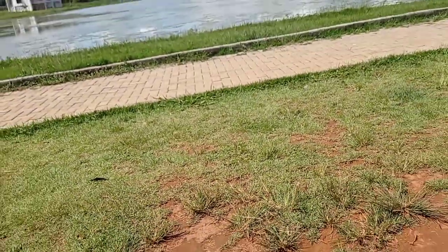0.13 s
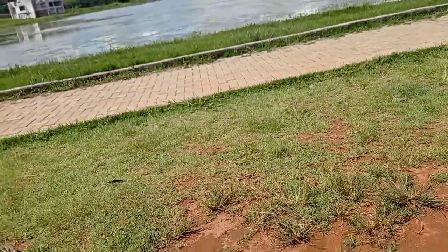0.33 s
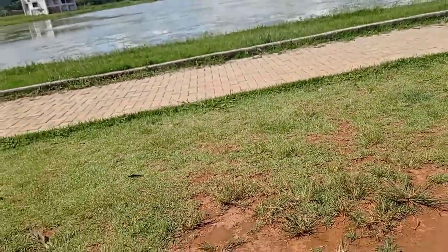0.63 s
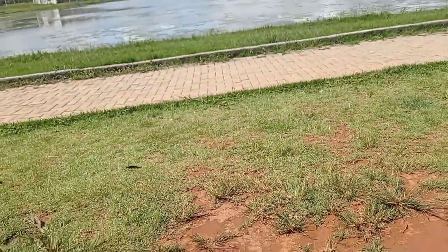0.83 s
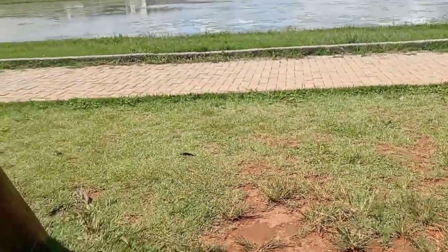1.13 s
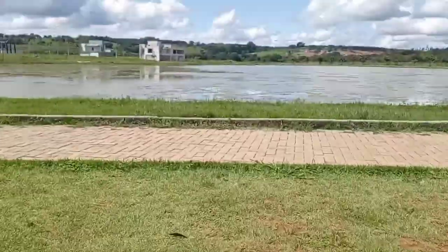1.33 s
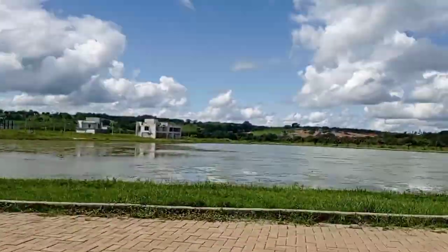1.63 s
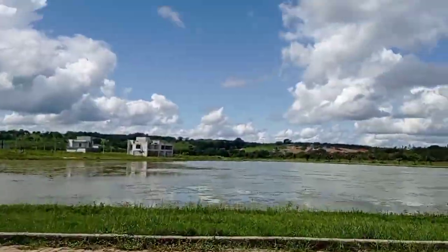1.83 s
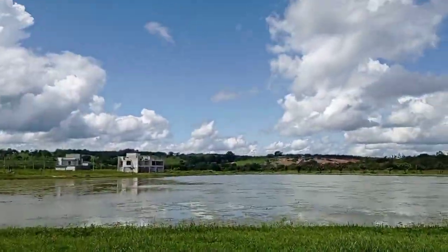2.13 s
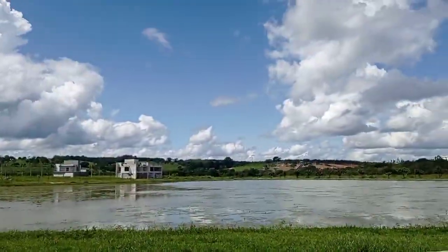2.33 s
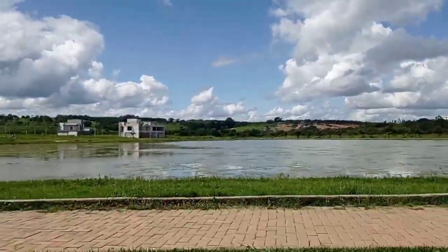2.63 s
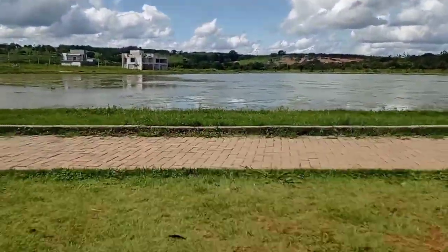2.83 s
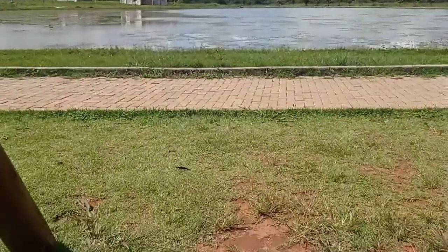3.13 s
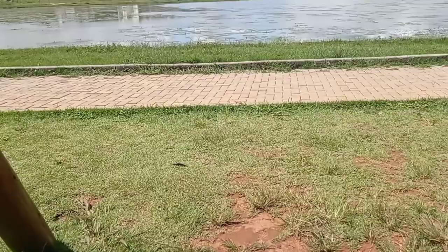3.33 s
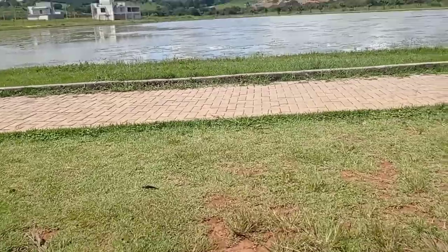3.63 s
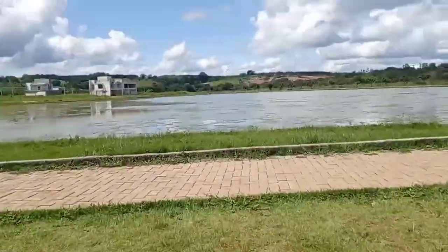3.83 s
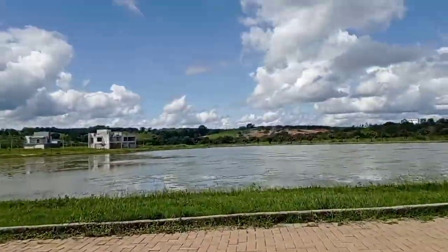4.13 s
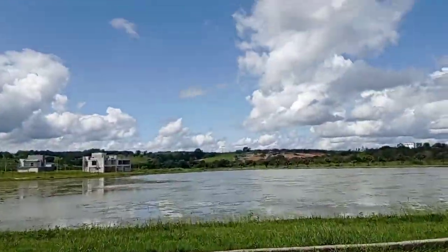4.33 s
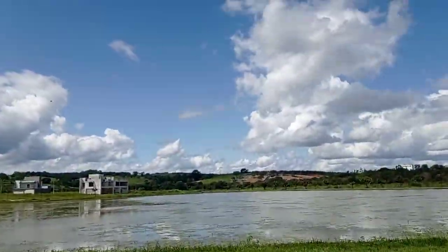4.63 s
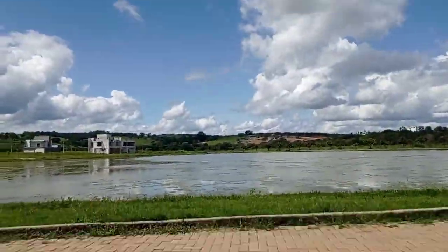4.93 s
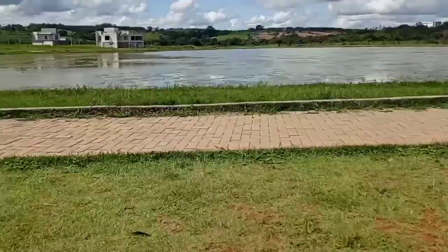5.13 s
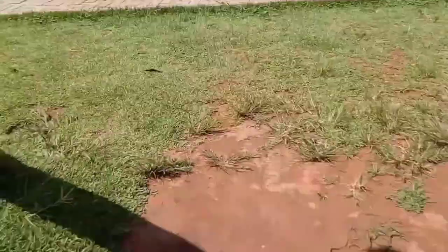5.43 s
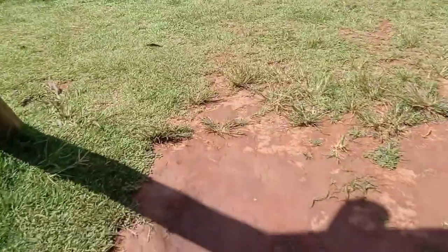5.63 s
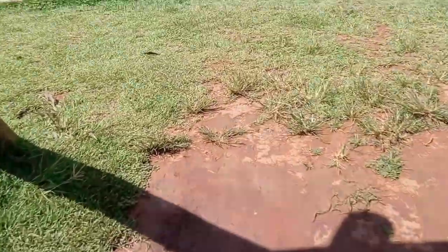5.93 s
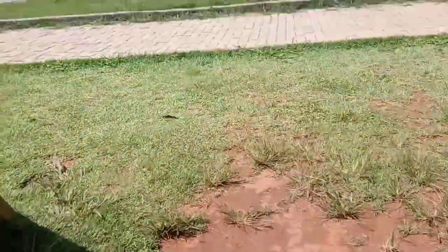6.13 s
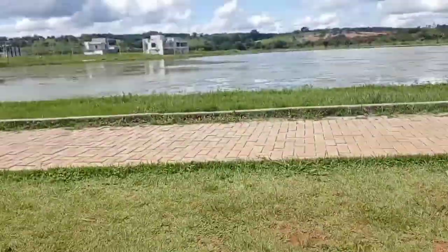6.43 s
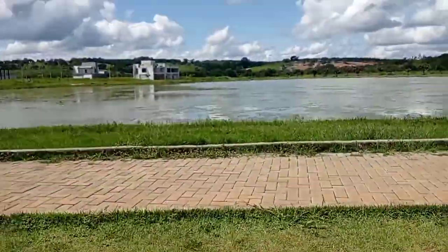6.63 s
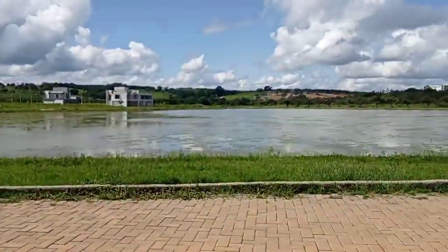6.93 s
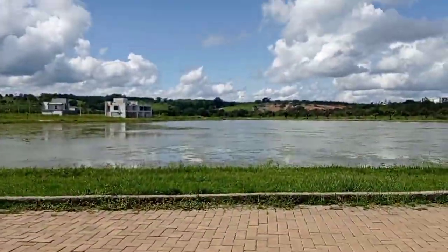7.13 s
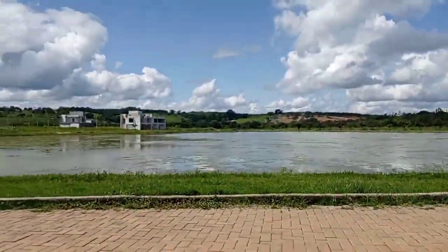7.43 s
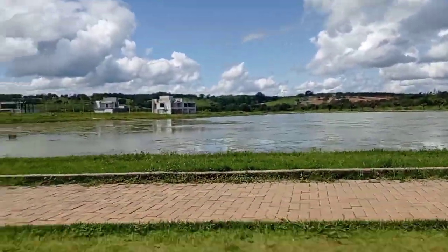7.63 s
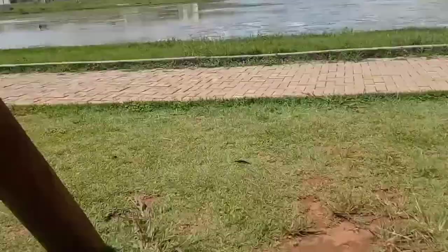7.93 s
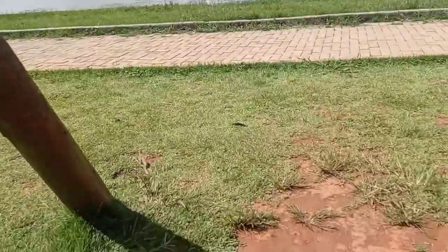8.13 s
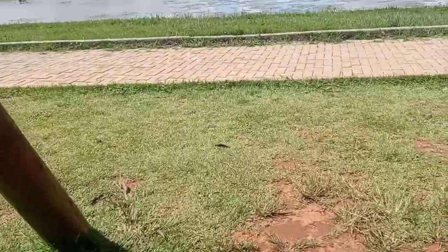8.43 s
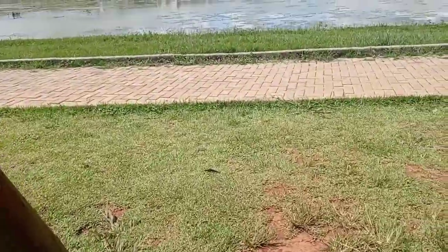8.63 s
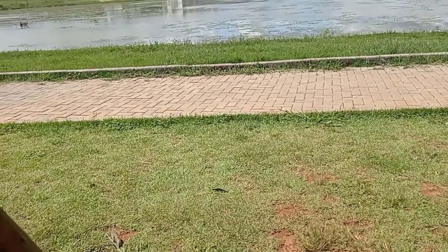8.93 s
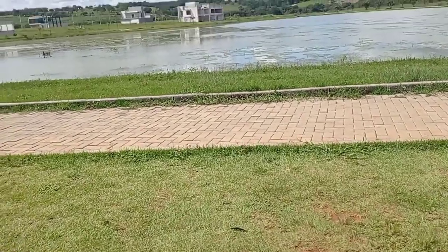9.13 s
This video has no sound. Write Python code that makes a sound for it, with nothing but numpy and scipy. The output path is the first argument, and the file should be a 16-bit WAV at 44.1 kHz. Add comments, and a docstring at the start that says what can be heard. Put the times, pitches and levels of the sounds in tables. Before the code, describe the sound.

Open air beside a lake, heard dry and close from a swing seat through a phone: quiet low rumble, soft hiss, barely audible hum. Chain clicks and one short squeak at 0.1-0.4 s, then a lull with a wind thump near 1. At 1.3 two steel hangers squeal together, about 1240 and 860 Hz, the higher one stuttering and fading until 2. At 2.5-3 a rapid cluster of sharp yelping slips breaks into rough squeals and thin ringing. A faint very high chirp passes at 3.6. A long squeal runs 3.75-4.4, breaking up as it fades. At 5-5.6 a grating return squeal drops in pitch, ending in quick chirps and a click. Another outward squeal rises and fades at 6.2-6.9. The strong, raspy return comes at 7.45-7.95 with wind thumps. A tiny squeak and click at 8.05-8.25, then only quiet air.

```python
"""Two dry steel hangers of a playground swing, heard from its seat, squeal by stick-slip, each on its own pitch.
When both sing they shake one another, grind and stutter: overtone sums with modulated phase, plus coloured noise.
Between them come short slips (swelling tones with rasp), thin gliding sines and chain clicks (noise bursts).
Wind thumps (damped low tones), low rumble, hiss and a faint hum fill the open air."""
import sys
import numpy as np
from scipy import signal
from scipy.fft import rfft, irfft, next_fast_len
from scipy.io import wavfile
from scipy.ndimage import uniform_filter1d, map_coordinates

SR = 44100
rng = np.random.default_rng(int(sys.argv[2]) if len(sys.argv) > 2 else 0)


def waveform_to_disk(signal):
    """Save audio, clipped to [-1, 1], as 16-bit WAV at the path in sys.argv[1]."""
    frames = np.transpose(np.atleast_2d(signal))
    scaled = np.clip(frames, -1, 1) * 32767
    samples = np.round(scaled).astype(np.int16)
    wavfile.write(sys.argv[1], SR, samples)


N = 408807
TOP_HZ = 8350  # band limit

# colour of scraping steel: f/Hz, relative density/dB per Hz
GRIND_SPECTRUM = [(200, -21.5), (600, -6.5), (1000, 7.5), (1500, -7.5), (2300, -3), (4000, -16), (5800, -7),
                  (7200, -19), (8300, -58)]


def amp(db):
    """Decibels to gain."""
    return 10 ** (np.asarray(db) / 20)


def unit(x):
    """x at rms 1."""
    return x / np.sqrt(np.mean(x ** 2) + 1e-20)


def along(points, hz):
    """Interpolate (f/Hz, value) points on a log frequency axis."""
    f, v = np.transpose(points)
    return np.interp(np.log(hz + 1), np.log(f + 1), v)


def curves(rows):
    """One value per sample for each column after the time."""
    s, *cols = np.transpose(rows)
    return [np.interp(np.arange(N) / SR, s, c) for c in cols]


def wobble(rate_hz):
    """Smooth random curve through rate_hz random knots a second."""
    knots = rng.standard_normal(int(N * rate_hz / SR) + 4)
    return map_coordinates(knots, [np.arange(N) * rate_hz / SR])


def filtered(x, response):
    """x times a response of frequency."""
    m = next_fast_len(N + 8192)
    return irfft(rfft(x, m) * response(np.fft.rfftfreq(m, 1 / SR)), m)[..., :N]


def noise(spectrum):
    """Coloured noise of rms 1."""
    return unit(filtered(rng.standard_normal(N), lambda hz: amp(along(spectrum, hz))))


def overtones(phase, hz, count, flicker=lambda: 1, above=1):
    """Harmonics 2 to count under the band limit, scaled by above past the knee, before the frame colours them."""
    knee_hz = 2750
    total = 0
    for k in range(2, count + 1):
        gain = (k * hz < TOP_HZ) * np.where(k * hz > knee_hz, above, 1)
        total = total + gain * flicker() * np.cos(k * phase)
    return total


def radiated(x):
    """x through the resonances of the frame."""
    # how well the frame radiates overtones: f/Hz, gain/dB
    frame_gain = [(200, -11), (500, -32.5), (1400, -6.5), (2400, -4), (3600, -16), (4400, -16),
                  (5050, -13.5), (5700, -12.5), (6230, -4.5), (6700, -20.5), (7200, -17), (8300, -47.5)]
    return filtered(x, lambda hz: amp(along(frame_gain, hz)))


def air():
    """Lumpy low rumble, a smoother hiss and a faint unsteady hum."""
    # open air: t/s, rumble level/dB, relative hiss level/dB
    air_levels = [(0, -43.5, -54.5), (.75, -46.5, -56), (.88, -44.5, -50.5), (1.1, -47.5, -55),
                  (3.4, -49, -59), (5.8, -45.5, -55.5), (7.1, -48, -57.5), (7.7, -45.5, -54.5),
                  (8.55, -48, -61), (8.87, -46.5, -53), (9.27, -47, -57)]
    # rumble colour: f/Hz, relative density/dB per Hz
    rumble_spectrum = [(20, -58.5), (43, -5), (80, -1.5), (115, 1.5), (326, -9.5), (470, -12), (950, -15),
                       (1700, -22.5), (3000, -65)]
    # hiss colour: f/Hz, relative density/dB per Hz
    hiss_spectrum = [(500, -13.5), (1500, 7), (2380, 13), (3110, 9), (3680, 5.5), (6430, 1.5), (7400, -8.5),
                     (8300, -34)]
    # hum partials: mean f/Hz, relative level/dB
    hum_partials = [(118.4, -63), (473.7, -62)]
    rumble_db, hiss_db = curves(air_levels)
    t = np.arange(N) / SR
    hum = 0
    for hz, db in hum_partials:
        level = amp(db + 2.0 + 0.72 * wobble(10))
        hum = hum + level * np.sin(2 * np.pi * hz * t + 1.7 * wobble(8))
    rumble = amp(rumble_db + 1.4 * wobble(12)) * noise(rumble_spectrum)
    hiss = amp(hiss_db + 5.5 + wobble(9)) * noise(hiss_spectrum)
    return hum + rumble + hiss


def clicks():
    """Chain links knock together: exponentially decaying bursts of noise."""
    # clicks: t/s, onset level/dB, t60/s
    click_rows = [(0.068, -36.5, 0.07), (0.216, -30.5, 0.035), (0.268, -24, 0.13), (5.585, -20.5, 0.068),
                  (8.234, -26.5, 0.061)]
    envelope, t = np.zeros(N + SR), np.arange(SR // 16) / SR
    for s, db, t60_s in click_rows:
        envelope[round(s * SR):][:len(t)] += amp(db - 60 * t / t60_s)
    return envelope[:N] * noise(GRIND_SPECTRUM)


def slips():
    """Each slip is a squeal of a dozen cycles that swells and breaks off, its treble rasping as it lets go."""
    # single slips: peak t/s, peak level/dB, f/Hz
    slip_rows = [(0.281, -17, 1007), (0.405, -41, 1106), (0.572, -41, 1028), (0.587, -35, 1012),
                 (0.675, -40, 973), (1.343, -18, 1040), (1.357, -16.5, 1085), (2.471, -22, 984),
                 (2.527, -9.5, 1055), (2.555, -13, 1100), (2.576, -15.5, 1090), (2.6, -15, 1090),
                 (2.628, -17, 1163), (2.662, -18.5, 1055), (2.68, -20, 1013), (3.091, -40.5, 923),
                 (5.48, -28, 1217), (5.503, -26.5, 1233), (5.543, -27, 1220), (5.564, -27, 1180),
                 (5.584, -16.5, 1121), (6.337, -18.5, 1146), (6.358, -12.5, 1164), (6.38, -10, 1181),
                 (6.393, -20.5, 1166), (7.439, -38, 920), (8.045, -26.5, 1180), (8.242, -24.5, 952)]
    lead_s, typical_s, mean_rise = .02, .006, .012  # rise is a share of pitch
    fall_share, treble_lag_s = 0.69, 0.0033  # fall time over rise time; delay of the treble peak
    low, high = np.zeros(N + SR), np.zeros(N + SR)
    t = np.arange(SR // 16) / SR - lead_s
    scrape = noise(GRIND_SPECTRUM)
    shiver_rad = .25 * wobble(300)

    def swell(t, rise_s):
        """Squared sech, steeper after its peak."""
        return 1 / np.cosh(t / (rise_s * np.where(t > 0, fall_share, 1))) ** 2

    for (s, db, hz), (bite, longer, rise) in zip(slip_rows, rng.standard_normal((len(slip_rows), 3))):
        i = round((s - lead_s) * SR)
        here = slice(i, i + len(t))
        rise_s = typical_s * amp(longer)
        climb = mean_rise * (1 + rise) * np.tanh(t / typical_s)
        phase = 2 * np.pi * hz * np.cumsum(1 + climb) / SR
        rasp = .08 + .5 * (db < -33)  # faint slips scrape more
        low[here] += amp(db) * swell(t, rise_s) * (np.cos(phase) + rasp * scrape[here])
        upper = overtones(phase + shiver_rad[here], hz, count=6)
        high[here] += amp(db - 12.0 + 2.8 * bite) * swell(t - treble_lag_s, rise_s) * upper
    return low[:N] + radiated(high[:N])


def whistles():
    """Thin gliding sines, wavering in level: high partials ringing out of the squeals, and lone chirps, perhaps birds."""
    # whistles: t/s, length/s, from f/Hz, to f/Hz, relative level/dB
    whistle_rows = [(0.835, 0.077, 1400, 1550, -51), (2.472, 0.07, 1150, 1150, -34),
                    (2.655, .017, 6240, 6220, -28), (2.655, .038, 7170, 7150, -36),
                    (2.673, .02, 6210, 6190, -29), (2.717, 0.064, 6160, 6270, -24),
                    (2.72, .065, 7100, 7130, -33), (2.779, 0.07, 1570, 1550, -40.5),
                    (3.555, 0.19, 6560, 6720, -26), (5.012, 0.039, 2490, 2390, -28.5),
                    (5.052, 0.063, 2410, 2530, -30), (5.359, 0.091, 1550, 1580, -39),
                    (7.697, 0.035, 2380, 2480, -30.5)]
    out, waver = np.zeros(N + SR), amp(3.5 * wobble(110))
    for s, length_s, from_hz, to_hz, db in whistle_rows:
        count = round(length_s * SR)
        u = np.arange(count) / count
        phase = 2 * np.pi * np.cumsum(from_hz + (to_hz - from_hz) * u) / SR
        sharpness = 1 + 5.5 * (length_s > .1)  # a long one rises to a sharp peak
        swell = np.sin(np.pi * u ** 0.82) ** sharpness
        out[round(s * SR):][:count] += amp(db + 4.0) * swell * np.sin(phase)
    return out[:N] * waver


def thumps():
    """Eddies press on the microphone: quickly damped low tones of random sign."""
    # wind thumps: t/s, relative level/dB
    thump_rows = [(0.975, -26.5), (2.65, -28.5), (7.593, -33), (7.61, -22.5), (7.727, -24.5), (7.76, -32)]
    typical_hz, t60_s, attack_s = 140, .03, .002
    out, t = np.zeros(N + SR), np.arange(SR // 16) / SR
    for (s, db), (spread, sign) in zip(thump_rows, rng.standard_normal((len(thump_rows), 2))):
        tone = np.sin(2 * np.pi * typical_hz * amp(1.8 * spread) * t)
        push = tone * amp(-60 * t / t60_s) * (1 - np.exp(-t / attack_s))
        out[round(s * SR):][:len(t)] += 3.4 * amp(db) * np.sign(sign) * push
    return out[:N]


def sliding(spans, size):
    """A gate open inside (from s, to s) spans, edges size samples long, and the time since it opened."""
    t = np.arange(N) / SR
    inside = [(t >= a) & (t < b) for a, b in spans]
    age_s = sum(on * (t - a) for on, (a, b) in zip(inside, spans))
    return uniform_filter1d((sum(inside) > 0) * 1., size=size), age_s


def first():
    """First hanger's squeals swell in on drawn curves: pitch, level, overtone level, gate and age."""
    # one curve a squeal, rows of: t/s, f/Hz, rms level/dB
    squeals = [
        [(1.259, 1238, -23), (1.365, 1241, -21.5), (1.38, 1227, -51.5), (1.397, 1248, -18.5), (1.43, 1244, -22),
         (1.54, 1231, -29), (1.635, 1240, -27), (1.8, 1256, -34.5), (1.88, 1239, -42.5), (1.996, 1245, -44)],
        [(2.6, 1118, -32), (2.63, 1184, -23.5), (2.66, 1218, -33), (2.705, 1209, -24), (2.73, 1234, -37.5),
         (2.785, 1251, -44.5)],
        [(2.806, 1346, -31), (2.89, 1339, -48)],
        [(3.74, 1256, -42), (3.77, 1276, -31.5), (3.815, 1213, -25.5), (3.84, 1245, -18.5), (3.93, 1232, -21),
         (4.07, 1239, -32), (4.299, 1220, -35), (4.43, 1215, -41)],
        [(5.018, 1111, -19.5), (5.07, 1182, -22.5), (5.175, 1134, -19.5), (5.2, 982.7, -35.5),
         (5.232, 801.3, -31), (5.305, 747, -27.5)],
        [(5.323, 1172, -27.5), (5.425, 1163, -31), (5.45, 1201, -40)],
        [(6.234, 1273, -27), (6.307, 1281, -29.5)],
        [(6.315, 1153, -31), (6.345, 1143, -23.5), (6.39, 1197, -26), (6.43, 1193, -28.5), (6.47, 1215, -35.5),
         (6.525, 1221, -28.5), (6.66, 1217, -25), (6.902, 1243, -40.5)],
        [(7.466, 1221, -27), (7.482, 1212, -18), (7.51, 1229, -14.5), (7.55, 1161, -14), (7.64, 1178, -16),
         (7.672, 1169, -18), (7.69, 1195, -35.5)],
        [(7.7, 1313, -34), (7.835, 1330, -37)],
        [(7.838, 1212, -28.5), (7.865, 1159, -26.5), (7.9, 1165, -31.5), (7.939, 1148, -43)],
    ]
    # one value a squeal: overtone brightness/dB, before thinning and growth
    squeal_bright_db = [-6.5, 2, -7, -6, -2, -10, -7.5, -10.5, -2.5, 5.5, -3]
    attack_s = 0.0077
    rows = [(*row, bright) for squeal, bright in zip(squeals, squeal_bright_db) for row in squeal]
    hz, db, bright_db = curves(rows)
    gate, age_s = sliding([(squeal[0][0], squeal[-1][0]) for squeal in squeals], size=520)
    swell = np.where(age_s > 0, 1 - 0.5 * np.exp(-age_s / attack_s), .5)
    return hz, db, bright_db, gate * uniform_filter1d(swell, size=300), age_s


def second():
    """Second hanger: each squeal eases into its last pitch while its level slides, then dies away."""
    # one row a squeal: t/s, length/s, from f/Hz, to f/Hz, first rms level/dB, last rms level/dB
    squeals = [(1.29, .108, 844.3, 884.3, -15.5, -24), (2.628, 0.062, 987, 955, -22, -35.5),
               (2.721, .07, 971.6, 952.7, -23.5, -37.5), (2.795, .106, 1135, 1163, -39, -33.5),
               (2.906, .137, 723.3, 748.6, -26.5, -46), (3.76, .155, 825.7, 895.2, -22, -29.5),
               (4.98, 0.043, 989.6, 1006, -41.5, -27), (5.192, 0.083, 967.4, 950, -24, -39),
               (5.314, 0.054, 889.6, 840, -32.5, -39.5), (6.282, 0.0093, 823, 831, -21.5, -25),
               (6.303, 0.069, 831.7, 911.4, -26, -33), (6.385, 0.14, 947, 961, -29, -41),
               (7.694, 0.041, 1170, 1200, -29, -37.5), (7.931, 0.029, 798, 735, -38, -35)]
    settle_power, release_s = 2.6, 0.013
    u = np.append(np.linspace(0, 1, num=12), 1)
    tail_s = np.append(np.zeros(12), .004)  # the last pitch holds into the release
    rows = []
    for s, length_s, from_hz, to_hz, first_db, last_db in squeals:
        pitch_hz = to_hz + (from_hz - to_hz) * (1 - u) ** settle_power
        level_db = first_db + (last_db - first_db) * u
        rows.append(np.transpose([s + length_s * u + tail_s, pitch_hz, level_db]))
    hz, db = curves(np.concatenate(rows))
    gate, _ = sliding([(s, s + length_s) for s, length_s, *_ in squeals], size=90)
    keep = np.exp(-1 / (release_s * SR))
    release = signal.lfilter([1 - keep], [1, -keep], gate)
    return hz, amp(db) * np.maximum(gate, release)


def falters(db_a):
    """Gain of the first hanger, dipping each time it sticks for an instant in mid-squeal."""
    # sticks: t/s, dip/dB
    sticks = [(1.485, 13), (1.502, 20), (1.528, 10), (1.548, 14), (1.581, 9), (1.886, 21), (1.92, 14),
              (1.974, 26), (4.31, 14), (4.343, 17), (4.369, 10), (4.403, 25), (5.362, 12), (7.545, 16)]
    strong_s, faint_s = 0.0027, 0.0062  # dip half-length in a strong and in a faint squeal
    t, dip_db = np.arange(N) / SR, np.zeros(N)
    for s, db in sticks:
        i = round(s * SR)
        near = slice(i - SR // 20, i + SR // 20)
        width_s = faint_s if db_a[i] < -35 else strong_s
        dip_db[near] -= db * np.exp(-((t[near] - s) / width_s) ** 2)
    return amp(dip_db)


def roughness(db_a, age_s, gain_b, back):
    """How unevenly the steel slides, 0-1: more on the return, and while the bar shakes."""
    # a loud return squeal catches and runs unevenly: from t/s, to t/s
    catches = [(5.018, 5.11), (7.535, 7.6)]
    calm, back_rough, shake_rough, catch_rough = .07, .29, .5, .35
    faint_rough_per_db, shake_s = .015, .15
    lag = round(shake_s * SR)
    # the bar still shakes after a loud second hanger
    shaking = np.roll(uniform_filter1d(np.tanh(gain_b / amp(-28)), size=lag), lag)
    faint = (age_s > 0) * faint_rough_per_db * np.clip(-18 - db_a, 0, None)
    returning = back_rough + faint + catch_rough * sliding(catches, size=1)[0]
    outward = calm + shake_rough * shaking
    return np.clip(uniform_filter1d(np.where(back, returning, outward), size=1500), 0, .9)


def hangers():
    """Two stick-slip squeals, coupled through the top bar, with the grinding that goes with them."""
    swing_s, back_from_s, back_s = 2.5, 2.4, 1  # full swing; phase and length of the return stroke
    bloom_db, bloom_s = 13.5, 0.1  # overtones start this much weaker and grow in
    hold_s, thins_db_per_db = 0.054, 0.3  # overtones sound on through short dips; fewer when louder
    dulls_below_db = -41  # a fading outward squeal loses its overtones
    close_hz, close_bright_db = 290, 9  # near pitches beat and sharpen the first hanger
    hz_a, db_a, bright_db, gate, age_s = first()
    hz_b, gain_b = second()
    gain_a = amp(db_a) * gate * falters(db_a)
    back = (np.arange(N) / SR - back_from_s) % swing_s < back_s

    both = np.tanh(gain_b / amp(-39.5)) * gate
    close = both * uniform_filter1d((np.abs(hz_a - hz_b) < close_hz) * 1., size=900)
    held_db = uniform_filter1d(db_a, size=round(hold_s * SR))
    over_db = bright_db - thins_db_per_db * (held_db + 29.0) + held_db - db_a
    over_db = over_db - bloom_db * np.exp(-age_s / bloom_s)
    over_db = over_db - 2 * ~back * np.clip(dulls_below_db - held_db, 0, None)
    over_db = over_db + close_bright_db * close

    stutter = roughness(db_a, age_s, gain_b, back)
    unsettled = both * (.15 + .5 * np.tanh(gain_b / amp(-22)))  # the second hanger unsettles the slide
    rough = np.clip(stutter + unsettled - .3 * close, 0, 1)
    # the chain tugs at the hooks, twice as fast on the return
    tug_hz = 48 * (1 + back) * amp(4 * wobble(30))
    beat = np.cos(2 * np.pi * np.cumsum(tug_hz) / SR)

    def throb():
        """Uneven level of a rough slide."""
        tug = .4 * (stutter * (1 - both) + .3 * both) * beat
        return np.abs(1 - .25 * rough + tug + .42 * rough * wobble(210))

    def unsteady(hz):
        """Phase of a pitch that jitters with roughness."""
        jitter = .002 * wobble(25) + .021 * rough * wobble(260)
        return 2 * np.pi * np.cumsum(hz * (1 + jitter)) / SR

    def flicker():
        """Each overtone comes and goes on its own."""
        return amp((2.5 + 2.5 * rough) * wobble(110))

    phase_a, phase_b = unsteady(hz_a), unsteady(hz_b)
    rocked = phase_a + (.25 * both + .2 * close) * np.sin(phase_b)
    size_a, size_b = np.sqrt(2) * gain_a * throb(), np.sqrt(2) * gain_b * throb()
    upper_a = amp(over_db) * overtones(rocked, hz_a, count=9, flicker=flicker, above=amp(-7 * back))
    upper_a = upper_a + np.cos(rocked) - np.cos(phase_a)  # sum and difference tones of the two
    upper_b = amp(-10.5) * overtones(phase_b, hz_b, count=10, flicker=flicker, above=amp(-6))
    upper = radiated(np.sqrt(2) * gain_a * upper_a + size_b * upper_b)
    low_difference = amp(-12.5) * close * np.minimum(size_a, size_b) * np.cos(phase_a - phase_b)
    grit_gain = rough * (amp(-20) * gain_a + amp(-9) * gain_b)
    grit = grit_gain * amp(3.5 * wobble(150)) * noise(GRIND_SPECTRUM)
    fundamentals = size_a * np.cos(phase_a) + size_b * np.cos(phase_b)
    return fundamentals + upper + grit + low_difference


def scene():
    """The swing in the open air, one channel."""
    return (air() + clicks() + slips() + whistles() + thumps() + hangers())[None]


def record(dry):
    """The phone drops the deepest bass and all above the band limit, then adds its own faint noise."""
    heard = filtered(dry, lambda hz: (hz < TOP_HZ) / (1 + (48 / (hz + 1)) ** 4))
    return heard + amp(-99) * rng.standard_normal(dry.shape)


dry = scene()
out = record(dry)
waveform_to_disk(out)
```